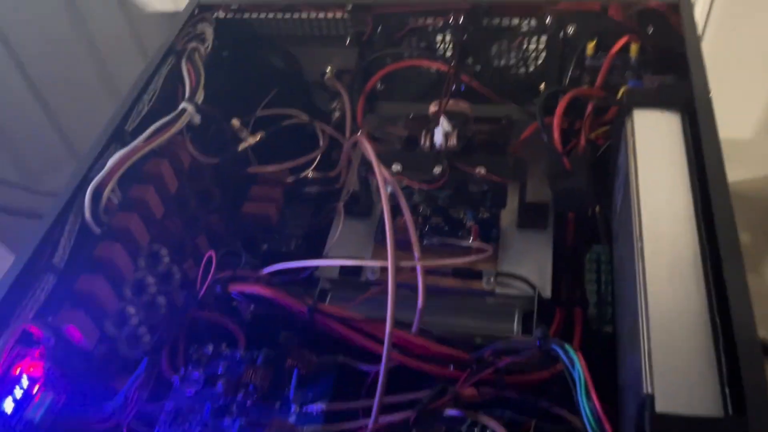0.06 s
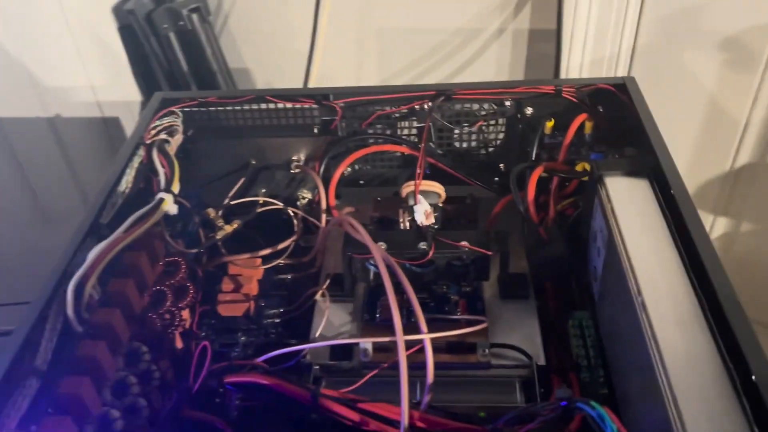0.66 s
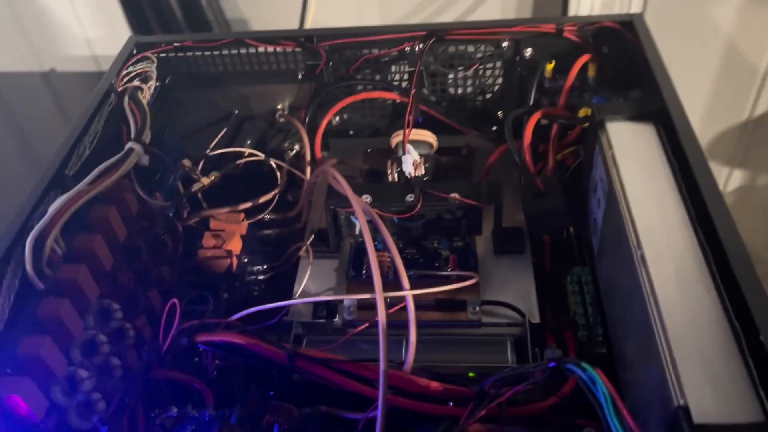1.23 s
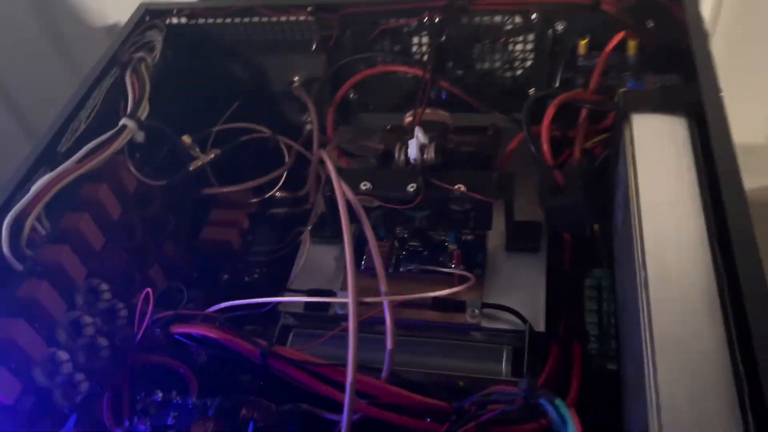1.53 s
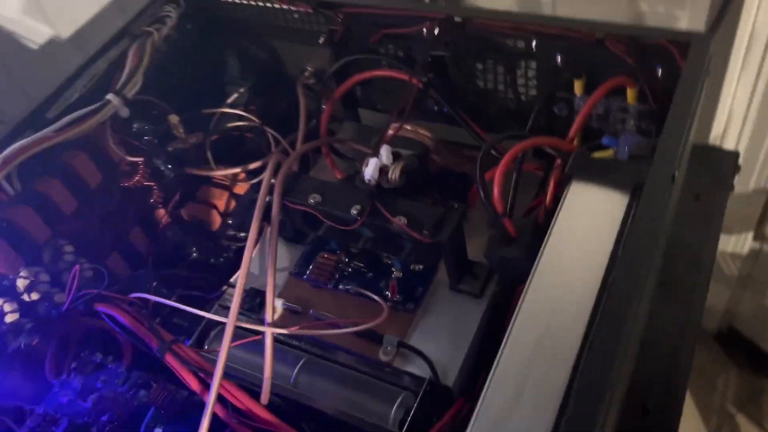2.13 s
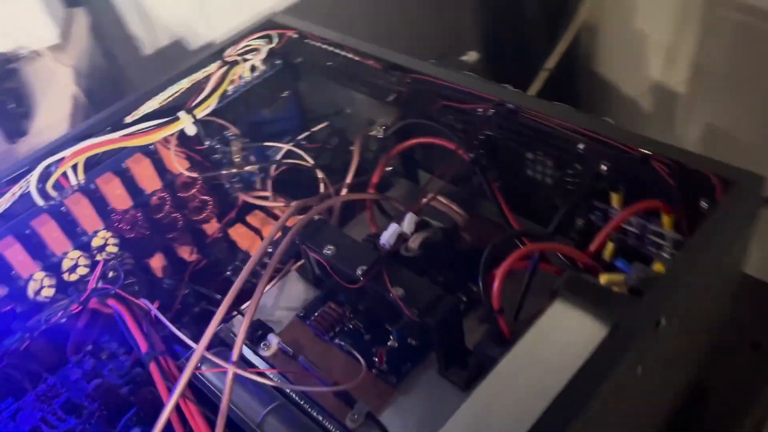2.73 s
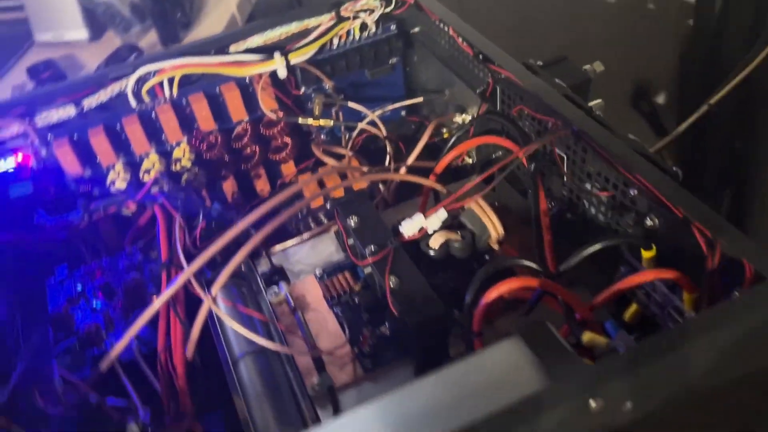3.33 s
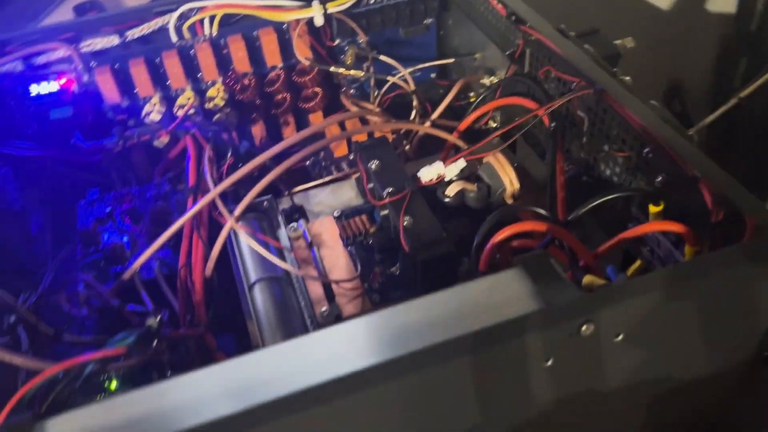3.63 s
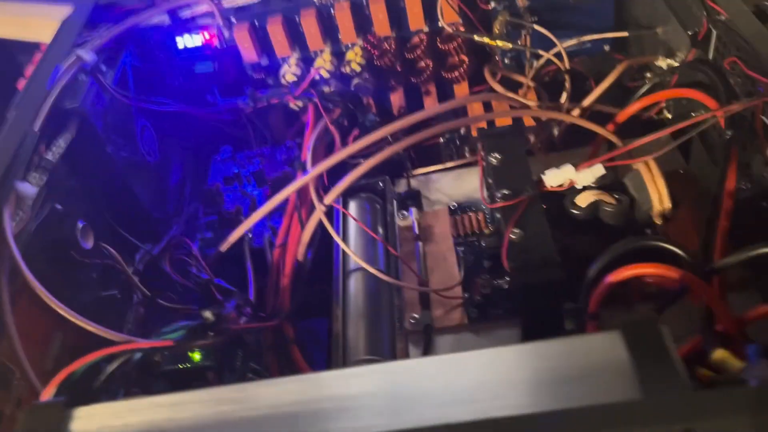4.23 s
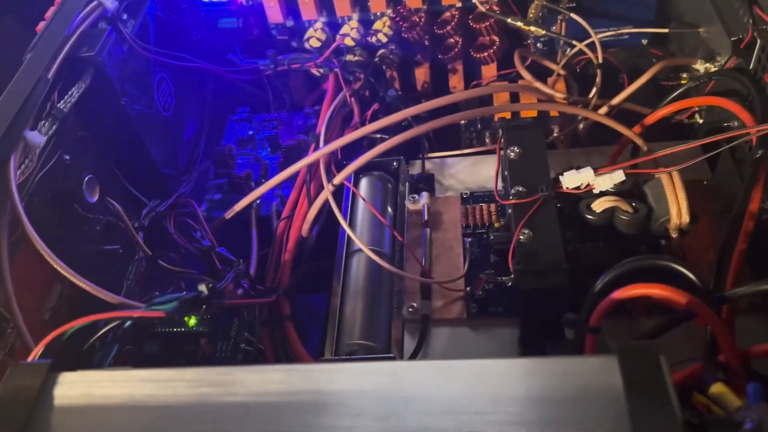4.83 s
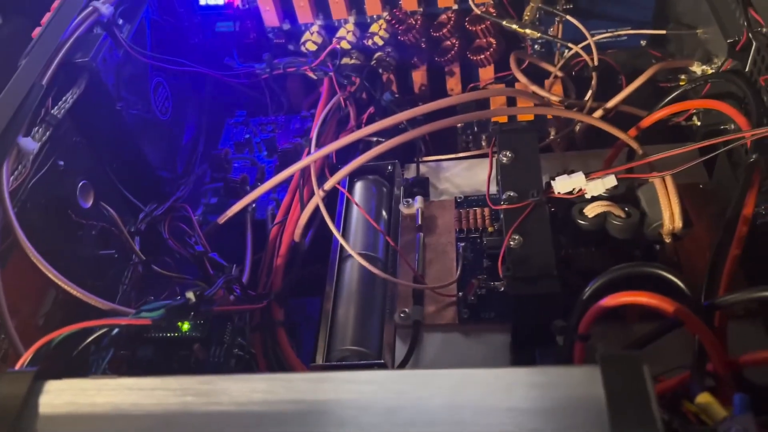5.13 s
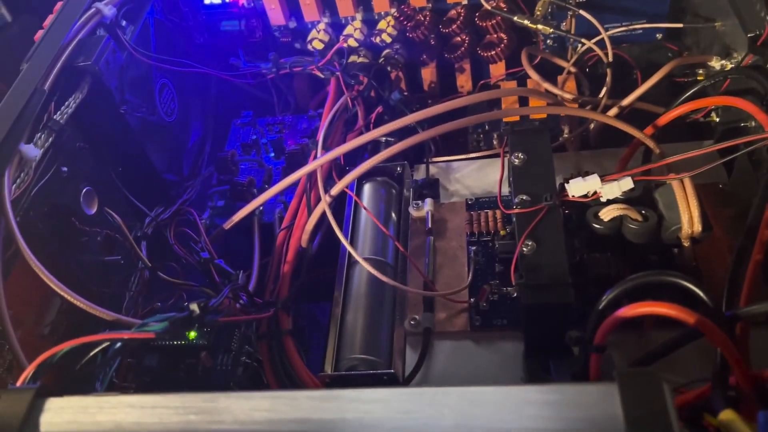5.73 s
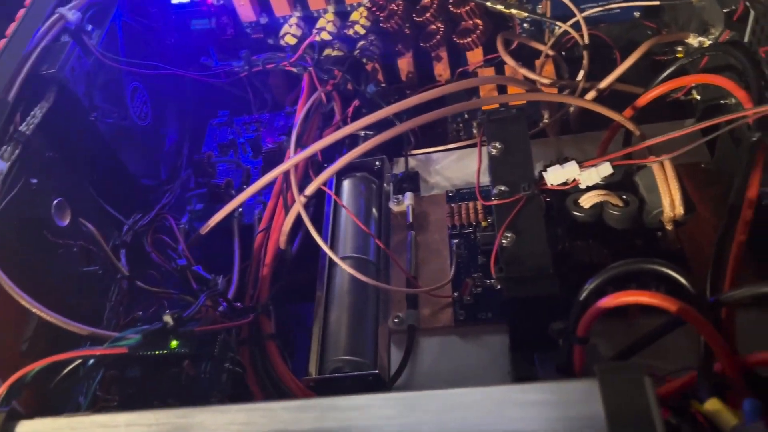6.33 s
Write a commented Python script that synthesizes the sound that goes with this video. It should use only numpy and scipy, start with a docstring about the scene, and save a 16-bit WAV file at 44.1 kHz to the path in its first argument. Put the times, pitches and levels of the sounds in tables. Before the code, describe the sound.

Two small cooling fans run without a break inside an open electronics case for about six and a half seconds, heard close on a hand-held stereo microphone. They make a steady whir of several mid-pitched tones that beat gently together, with rushing, hissing air, a softly throbbing low hum and two thin, shimmering whines high above. The pitch holds steady, but single tones swell, fade and shift between left and right as the microphone moves over the case toward its side. From about 1.8 seconds one fan's note grows firmer. Fingers brush faintly on the microphone's body near 0.7 seconds, and soft dry ticks with brushes come at about 2.3, 3.6 and 4.1 seconds, followed by a slight low bump at 4.3. From around 4 seconds the hiss turns a little brighter, and the fans carry on to the end.

```python
"""Two small cooling fans in an open equipment case, close up, on a hand-held camera's stereo mic.
The main fan sings on multiples of its shaft speed; a smaller fan adds its own note, two thin motor
whines sit high above, and air rushes through the case over a low hum. The mic drifts from the front,
over the case and toward its side, so tones swell and fade at each port as it crosses standing waves.
Fingers tick, brush and bump faintly on the camera body."""
import sys
import numpy as np
from scipy import signal
from scipy.fft import rfft, irfft
from scipy.io import wavfile
from scipy.ndimage import map_coordinates

SR = 44100
rng = np.random.default_rng(int(sys.argv[2]) if len(sys.argv) > 2 else 0)


def int16_out(signal):
    """Quantize to a 16-bit WAV file."""
    q = np.round(np.clip(np.atleast_2d(signal).T, -1, 1) * 32767)
    wavfile.write(sys.argv[1], SR, q.astype(np.int16))


N = 285060
TIME = np.arange(N) / SR
BINS = np.fft.rfftfreq(N, 1 / SR)

# Mic path: time_s, place (0 in front of the case, 1 over it, 2 at its side).
# Below, "by place" is one value for each; pan_db is left minus right; lead_rad is the left port's lead.
MIC_PATH = [(1.15, 0.6), (1.8, 1), (2.3, 1.4), (3.3, 1.77), (4.1, 1.7)]

# Air churning in the case, and hissing past blades and grilles: freq_hz, left_db, right_db
ROAR_SPECTRUM = [(20, -93, -93), (45, -76.5, -77), (82.5, -77, -76.5), (170, -70, -71), (220, -74, -73),
                 (298, -65.5, -67.5), (407, -73, -73), (530, -72.5, -77.5), (720, -74, -72),
                 (730, -75.5, -75.5), (1480, -79, -78), (1500, -80.5, -79.5), (2170, -84, -83.5),
                 (2570, -110, -110)]
HISS_SPECTRUM = [(1800, -110, -110), (2150, -86, -85.5), (2480, -82.8, -81), (2950, -84, -82.5),
                 (3250, -86.2, -84.3), (4600, -88.4, -83.7), (5600, -91.7, -85.3), (7100, -97.6, -89.4),
                 (9000, -93.3, -92.8), (10300, -98, -98), (11400, -97.3, -97.3), (13000, -103, -103),
                 (15600, -101, -101)]
PORT_LIKENESS = [(40, 1), (70, 1), (150, 0.75), (300, 0.92), (640, 0.42), (1300, 0.44), (2000, 0.21),
                 (3500, 0.3), (7000, 0.15), (7700, .5), (9000, 0.78), (10000, .62), (12000, 0.8)]  # air noise shared by the ports: freq_hz, coherence
PORT_LEAD = [(100, 0), (300, 0.15), (650, -0.8), (1300, -0.1), (2700, -1.2), (4500, -0.8), (7600, -1.7),
             (9000, 0.35), (10400, 3.1), (12000, 6), (12800, 6.8), (13800, 9.4), (15200, 12.5)]  # its phase between them: freq_hz, lead_rad
HOLLOW_GAIN = [(0, -.5, .5), (.6, .5, 2), (1.7, 1.8, 3), (2.3, 1.2, .5), (3.3, 0, -3.5), (4, -.5, -3),
               (5, 0, -1.5), (5.7, 0, -2), (6.45, 1.5, 0)]  # hollow case resonance: time_s, left_db, right_db
HOLLOW_NEARNESS = (3, -1, -1)  # how near the mic is to it: gain_db by place
RUSH_GAIN = (-1.5, 0.5, -1.2)  # broad rush of air: gain_db by place
# Deepest case resonance, grille hiss and finest hiss along the mic path: time_s, gain_db
DEEP_GAIN = [(0, .3), (1.3, -.5), (2.3, -.8), (3.4, -.8), (4.3, 1), (5.5, 4.2), (6.45, 1.8)]
GRILLE_GAIN = [(0, -2), (.4, -1.3), (1.2, -1.3), (1.75, 0.1), (2.3, -1.1), (2.8, -1.7), (3.4, -1.2),
               (4, -1.4), (4.3, -0.5), (5.2, -.8), (5.8, -0.5), (6.45, 0.4)]
FIZZ_GAIN = [(0, -.2), (1, .2), (1.7, 1), (2.5, -.6), (3.4, -2), (3.9, -1.5), (4.25, .5), (5.2, -.6),
             (6.45, .6)]
WALL_DELAY = [(0, 1.17), (1.3, 1.12), (2.5, 1.2), (4, 1.18), (6.46, 1.1)]  # echo off the case wall: time_s, delay_ms
BOARD_GAPS = [(284, 0.068, (-58, -58, -56.5)), (550, 0.13, (-74, -54.5, -53)),
              (730, 0.037, (-64, -60.5, -55)), (886, .08, (-75, -62, -60)), (1157, 0.17, (-68, -53, -73)),
              (1750, 0.054, (-71, -57.5, -62)), (2505, 0.025, (-57, -62.5, -58)),
              (2734, 0.038, (-64, -58.5, -77)), (2993, 0.046, (-79, -61, -58.5))]  # resonances between boards: centre_hz, log_width, level_db by place
JET_LEVEL = [(3.6, -77), (4.2, -57), (5.7, -55), (6.46, -58)]  # a grille's jet coming on axis: time_s, level_db
STRONG_HUM = [(0.0, -61), (1.3, -60), (1.47, -50), (2.15, -55), (2.97, -53), (3.62, -67), (4.3, -48.5),
              (5.12, -56.5), (6.45, -53)]  # strongest chassis hum line: time_s, level_db
FAINT_HUM = [(42.4, -66), (96.2, -69), (154.8, -65), (168.2, -60), (192.5, -65), (195.1, -64)]  # fainter lines: pitch_hz, level_db

HANDLING_TICKS = [(2.312, -44.5, -22), (3.550, -38.5, -13), (4.131, -39.5, -8)]  # ticks: start_s, base_level_db, rattle_relative_db
# Finger brushes and low bumps on the camera body: centre_s, level_db, half_length_s
FINGER_BRUSHES = [(0.67, -56, .035), (2.32, -58, .03), (3.565, -56.5, .03), (4.17, -56, .04)]
BODY_BUMPS = [(4.278, -48, 0.11)]
# Colour of each handling noise: freq_hz, gain_db
TICK_SPECTRUM = [(500, -26), (1500, 4), (2800, 5), (4000, -5), (5500, -1), (8000, -9.5), (15000, -30)]
BRUSH_SPECTRUM = [(500, -25), (1500, -13), (2800, 5), (5500, -1), (8500, 3), (12000, -11), (15000, -18)]
BUMP_SPECTRUM = [(15, -22), (42, 2), (65, 9), (100, -14), (150, -34), (500, -55)]

# Tones as the mic crosses their standing waves: time_s, level_db, pan_db, lead_rad
LOW_WHINE_PATH = [(0.0, -60.0, -14.0, 2.4), (0.28, -60.0, -11.0, 2.3), (0.36, -67.5, -3.0, 1.9),
                  (0.84, -73.0, 0.0, 0.4), (1.16, -61.5, -14.0, 3.4), (1.36, -57.5, -9.0, 4.4),
                  (1.76, -58.0, -5.0, 2.0), (2.04, -57.5, -21.0, 0.6), (2.24, -63.5, -12.0, 3.1),
                  (2.36, -59.0, -13.0, 4.3), (2.64, -64.0, -13.0, 2.9), (2.8, -56.5, -22.0, 3.8),
                  (3.08, -59.0, 2.0, 0.8), (3.44, -60.5, -5.0, 2.4), (3.56, -65.0, 4.0, 2.4),
                  (4.16, -57.0, -2.0, 6.3), (4.56, -65.0, 7.0, 6.1), (4.88, -59.0, 2.0, 5.3),
                  (5.12, -64.5, 4.0, 6.7), (5.4, -59.5, 5.0, 6.3), (5.6, -67.0, 9.0, 7.0),
                  (5.88, -65.5, 11.0, 4.4), (6.32, -59.0, -1.0, 5.5), (6.46, -61.0, 0.0, 6.0)]
HIGH_WHINE_PATH = [(0.0, -59.5, -9.0, -2.4), (0.2, -66.5, -2.0, -2.2), (0.44, -59.5, -10.0, -1.4),
                   (0.72, -71.0, 4.0, -0.1), (1.04, -62.5, -4.0, 4.5), (1.6, -59.0, -8.0, 3.8),
                   (1.72, -64.0, -11.0, 3.0), (2.08, -64.0, -6.0, 4.8), (2.28, -69.5, 6.0, 5.6),
                   (3.28, -64.5, -8.0, 9.5), (3.4, -70.0, 3.0, 11.6), (3.6, -61.5, -10.0, 11.7),
                   (4.0, -64.5, -10.0, 7.8), (4.28, -64.5, -1.0, 7.2), (4.48, -66.5, -9.0, 8.4),
                   (4.68, -62.5, -7.0, 6.5), (5.08, -63.0, -3.0, 5.3), (5.72, -55.0, -8.0, 5.6),
                   (6.04, -55.5, -13.0, 6.2), (6.46, -61.5, -9.0, 7.6)]
SMALL_BLADE_PATH = [(0, -53, -5, 0), (.35, -56.5, -17, 2.8), (1, -55, -13, 2.3), (1.45, -53.5, -10, .2),
                    (1.8, -46.8, -2, .1), (2.2, -46, 0, .2), (2.55, -47.8, -2, .1), (3.1, -45, 1, -.25),
                    (4.1, -45.2, -1, -.1), (5, -45.3, 1, -.15), (6.45, -45.8, 1, 0)]
SMALL_OVERTONE_PATH = [(0.0, -67.5, -9.0, 0.2), (0.44, -63.5, 6.0, 1.9), (1.04, -60.0, -7.0, 1.9),
                       (1.36, -59.0, -5.0, 2.6), (1.52, -64.0, -8.0, 2.7), (1.8, -58.0, -5.0, 3.0),
                       (2.32, -62.5, -7.0, 4.5), (2.76, -65.5, 7.0, 4.4), (3.24, -68.5, 7.0, 0.4),
                       (3.88, -62.5, 8.0, -0.1), (4.52, -57.0, -3.0, 0.5), (4.68, -58.5, 1.0, 0.1),
                       (5.48, -60.0, -1.0, 0.7), (6.04, -61.0, -6.0, 0.2), (6.46, -67.0, -7.0, -0.0)]
LOW_MOTOR_PATH = [(0.0, -57.5, -4.0, -0.2), (0.32, -58.0, -2.0, -0.3), (0.48, -65.0, -12.0, 1.3),
                  (1.0, -57.0, -4.0, 0.1), (1.16, -60.5, -10.0, 0.2), (1.6, -53.0, -5.0, 0.2),
                  (1.96, -52.5, 5.0, -0.0), (2.16, -57.5, 9.0, 0.6), (2.6, -54.5, 3.0, 1.4),
                  (3.28, -59.5, -18.0, 0.5), (3.44, -56.0, -10.0, -0.3), (3.96, -59.0, -9.0, 0.2),
                  (4.36, -52.5, -7.0, 0.1), (5.0, -54.0, -11.0, -0.5), (6.46, -54.5, -9.0, 0.3)]
HIGH_MOTOR_PATH = [(0, -47.5, -5, -.1), (.24, -51, -5, .1), (.44, -50.5, -11, .8), (.88, -48.5, -3, .7),
                   (1.16, -51, 1, .9), (1.52, -49.5, -7, .2), (1.64, -50, -14, .6), (2, -46.5, -1, .2),
                   (2.28, -48, 3, -.2), (2.6, -46.5, 7, -.3), (2.76, -48, 5, .2), (2.96, -44.5, 2, .2),
                   (3.35, -44.8, 0, 0), (3.72, -46.7, -2, -.5), (3.84, -50.5, -3, -.6),
                   (4.4, -48.7, -12, .2), (4.72, -49.5, -12, -1), (4.9, -48.3, -12, -.7),
                   (6.46, -50, -11, -.5)]
RING_PATH = [(0.0, -67.0, 1.0, 0.9), (0.44, -67.0, -10.0, -1.2), (1.08, -68.0, 4.0, -0.4),
             (1.36, -65.5, -3.0, -0.1), (1.68, -57.5, 1.0, 0.4), (2.0, -57.0, 4.0, 0.6),
             (2.32, -61.5, 1.0, 0.6), (3.68, -64.0, 2.0, -0.5), (3.84, -68.0, 4.0, -0.8),
             (4.16, -62.5, -13.0, -2.4), (4.52, -59.5, -7.0, -1.5), (5.12, -62.0, -5.0, -2.1),
             (6.46, -64.0, 0.0, -1.6)]
# Tuning of the motor whines: time_s, pitch_hz
LOW_WHINE_PITCH = [(0, 5912), (1.7, 5910), (2.75, 5917), (3.7, 5914), (4.3, 5909), (5, 5912), (6.46, 5908)]
HIGH_WHINE_PITCH = [(0, 6033), (1, 6041), (1.9, 6031), (2.5, 6036), (2.8, 6044), (3.3, 6034), (3.7, 6040),
                    (4.4, 6036), (5.2, 6042), (5.7, 6040), (6.46, 6048)]
SMALL_FAINT_TONES = [(2, -68), (8, -72.5)]  # small fan's upper tones: blade_note_multiple, level_db
SHAFT_SPEED = [(0, 62.42), (1.1, 62.43), (1.9, 62.35), (6.46, 62.37)]  # main fan's shaft: time_s, turns_per_s
WEAK_TONES = [(1, -56.5), (2, -65), (4, -59), (6, -58.5), (8, -67), (12, -63.5), (13, -70), (20, -70),
              (24, -71), (28, -67), (29, -65), (30, -69), (35, -72), (41, -71), (43, -72), (44, -69),
              (47, -74), (49, -76), (51, -75), (58, -74), (83, -77), (84, -76), (110, -81), (112, -80)]  # its weak tones: shaft_multiple, base_level_db
MIDDLE_TONES = [(7, (-53, -68, -62), (4, 1, -6)), (9, (-55, -52, -57.5), (4, 5, -6)),
                (10, (-53, -60, -63.5), (-2, 3, 2)), (11, (-53.5, -55.5, -59), (-2, 0, 1)),
                (14, (-75, -72, -58.5), (-8, 5, -6))]  # its middle tones: shaft_multiple, level_db by place, pan_db by place


def amp(db):
    """Decibels to gain."""
    return 10 ** (np.asarray(db) / 20)


def unit_rms(x):
    """Scales to rms 1."""
    return x / np.sqrt(np.mean(x ** 2) + 1e-20)


def follow(rows):
    """Each column of a time table, sample by sample."""
    times, *columns = np.transpose(rows)
    return np.array([np.interp(TIME, times, column) for column in columns])


def per_bin(rows):
    """Each column of a spectrum table, interpolated in log frequency."""
    hz, *columns = np.transpose(rows)
    return np.array([np.interp(np.log(BINS + 1), np.log(hz + 1), column) for column in columns])


def at_mic(by_place):
    """Glides between the values at the three places as the mic moves."""
    return np.interp(follow(MIC_PATH)[0], np.arange(len(by_place)), by_place)


def bell(hz, width):
    """A bell on the log-frequency axis."""
    return np.exp(-(np.log(BINS / hz + 1e-9) / width) ** 2)


def drift(rate_hz, knots_per_s=400):
    """A random wander of rms 1, changing up to about rate_hz."""
    knots = rng.standard_normal(4096)
    hz = np.fft.rfftfreq(len(knots), 1 / knots_per_s)
    slow = irfft(rfft(knots) * np.exp(-(hz / rate_hz) ** 2) * (hz > 0))
    return np.interp(TIME, np.arange(len(slow)) / knots_per_s, unit_rms(slow))


def noise(colour, shape=N):
    """Coloured noise of rms 1."""
    return unit_rms(irfft(rfft(rng.standard_normal(shape)) * colour, N))


def swells(rows):
    """An envelope of brief bell-shaped swells."""
    return sum(amp(db) * np.exp(-((TIME - centre_s) / half_s) ** 2) for centre_s, db, half_s in rows)


def tone(turns, db):
    """A sine on a running cycle count, at an rms level."""
    return np.sqrt(2) * amp(db) * np.sin(2 * np.pi * turns)


def stereo_tone(turns, db, pan_db, lead_rad, flutter):
    """A tone at both mic ports; uneven inflow makes it flutter."""
    lead_turns = np.array([[1], [0]]) * lead_rad / (2 * np.pi)
    shares = amp([pan_db / 2, -pan_db / 2])
    panned = tone(turns + rng.random() + lead_turns, db) * shares / shares.mean(0)
    return panned * (1 + flutter * drift(15))


def swept_tone(turns, path, flutter):
    """A tone whose level, pan and phase change as the mic crosses its standing waves."""
    return stereo_tone(turns, *follow(path), flutter)


def placed_tone(turns, db, pan_db, lead_rad, flutter, sway_hz=1.5):
    """A tone whose level and pan follow the mic's place and sway with the hand."""
    level = at_mic(db) + drift(sway_hz)
    pan = at_mic(pan_db) + drift(sway_hz)
    return stereo_tone(turns, level, pan, lead_rad, flutter)


def turbulence(spectrum):
    """Spectra of air noise at the two ports, alike in the bass and less so higher up."""
    left, unrelated = rfft(rng.standard_normal((2, N)))
    likeness = np.clip(per_bin(PORT_LIKENESS)[0], -1, 1)
    right = likeness * left + np.sqrt(1 - likeness ** 2) * unrelated
    right *= np.exp(-1j * per_bin(PORT_LEAD)[0])
    return np.array([left, right]) * amp(per_bin(spectrum)) * np.sqrt(SR / 2)


def wall_echo(sound, share=0.12):
    """The case wall's echo combs the sound; its delay changes with the mic's distance."""
    earlier = np.arange(N) - follow(WALL_DELAY)[0] * SR / 1000
    return sound + share * np.array([map_coordinates(port, [earlier], order=3) for port in sound])


def air():
    """Roar with two case resonances, and hiss that flickers with the flow."""
    roar, hiss = turbulence(ROAR_SPECTRUM), turbulence(HISS_SPECTRUM)
    hollow, deep, fine = bell(hz=296, width=0.3), bell(hz=176, width=0.18), bell(hz=10000, width=0.6)
    drone = irfft(roar * hollow, N) * amp(follow(HOLLOW_GAIN))
    boom = irfft(roar * deep, N) * amp(follow(DEEP_GAIN))
    rush = irfft(roar * (1 - hollow - deep), N) * amp(at_mic(RUSH_GAIN))
    grille_db = follow(GRILLE_GAIN) + 0.4 * drift(16) + 0.85 * drift(47)
    grille = wall_echo(irfft(hiss * (1 - fine), N)) * amp(grille_db)
    fizz_db = follow(FIZZ_GAIN) + 0.4 * drift(6) + 0.6 * drift(50)
    fizz = irfft(hiss * fine, N) * amp(fizz_db)
    return drone + boom + rush + grille + fizz


def board_gaps():
    """Air rings the gaps between the boards and gives the hiss a reedy colour."""
    flow = rfft(rng.standard_normal((2, N)))
    return sum(unit_rms(irfft(flow * bell(hz, width), N)) * amp(at_mic(db))
               for hz, width, db in BOARD_GAPS)


def grille_jet():
    """A jet of air straight ahead of the mic hisses at both ports alike."""
    return noise(bell(hz=4680, width=0.32)) * amp(follow(JET_LEVEL)[0])


def chassis_hum(strong_hz=57.9):
    """The chassis hums low; its strongest line throbs against the main fan's shaft tone."""
    strong = tone(strong_hz * TIME + rng.random() + 0.12 * drift(0.37), follow(STRONG_HUM)[0])
    faint = sum(tone(hz * TIME + rng.random() + 0.1 * drift(2.1), db + 2.6 * drift(0.61))
                for hz, db in FAINT_HUM)
    return strong + faint


def handling_ticks(decay_s=0.0025, rattle_decay_s=0.03):
    """Soft dry ticks, a little to the right, with a short rattle inside the case."""
    envelope = np.zeros(N)
    for start_s, db, rattle_db in HANDLING_TICKS:
        age = np.maximum(TIME - start_s, 0)
        rattle = amp(rattle_db) * np.exp(-age / rattle_decay_s)
        envelope += amp(db) * (TIME >= start_s) * (np.exp(-age / decay_s) + rattle)
    return noise(amp(per_bin(TICK_SPECTRUM)), shape=(2, N)) * envelope * amp([[1], [4]])


def finger_brushes():
    """Short soft swishes of skin on the camera body, right by the mic."""
    return unit_rms(irfft(turbulence(BRUSH_SPECTRUM), N)) * swells(FINGER_BRUSHES)


def body_bumps():
    """A brief rumble reaches the mic through the camera body."""
    return noise(amp(per_bin(BUMP_SPECTRUM)[0])) * swells(BODY_BUMPS)


def motor_whine(pitch, path):
    """A thin, shimmering whine that fades and shifts sideways as the mic moves."""
    hz = follow(pitch)[0] * (1 + 0.00016 * drift(2.3) + 0.00046 * drift(24.6))
    return swept_tone(np.cumsum(hz) / SR, path, flutter=0.2) * amp(0.6 * drift(6))


def small_fan(blade_hz=571.4):
    """A faster fan whose firm blade note beats against the main fan's ninth tone."""
    turns = np.cumsum(blade_hz * (1 + 0.000397 * drift(0.4))) / SR
    note = swept_tone(turns, SMALL_BLADE_PATH, flutter=0.03)
    overtone = swept_tone(4 * turns, SMALL_OVERTONE_PATH, flutter=0.15)
    faint = sum(stereo_tone(multiple * turns, db, pan_db=4 * drift(0.7), lead_rad=drift(0.5), flutter=0.19)
                for multiple, db in SMALL_FAINT_TONES)
    return note + overtone + faint


def weak_shaft_tones(turns, shaft_hz, fade_db=0.8, apart_hz=1100):
    """Weak tones fade in standing waves; short waves differ more between the ports."""
    ports = np.zeros((2, N))
    near_db = at_mic(HOLLOW_NEARNESS)
    for multiple, db in WEAK_TONES:
        apart = min(multiple * shaft_hz / apart_hz, 1)
        # near the hollow resonance the middle tones gain and the others recede
        lean = 0.82 if 3 < multiple < 13 else -0.57
        level = db + lean * near_db + fade_db * np.sqrt(apart) * drift(0.89)
        side_db, side_turns = fade_db * apart * drift(0.97), 0.2 * apart * drift(0.63)
        phase = multiple * turns + rng.random()
        ports += [tone(phase + side_turns, level + side_db), tone(phase - side_turns, level - side_db)]
    return ports


def main_fan(blades=5):
    """Blade and motor tones, all locked to one slightly unsteady shaft."""
    shaft_hz = follow(SHAFT_SPEED)[0] * (1 + 0.0003 * drift(5))
    turns = np.cumsum(shaft_hz) / SR
    low_motor = swept_tone(16 * turns, LOW_MOTOR_PATH, flutter=0.07)
    high_motor = swept_tone(22 * turns, HIGH_MOTOR_PATH, flutter=0.07)
    ring = swept_tone(31 * turns, RING_PATH, flutter=0.18)
    blade_note = placed_tone(blades * turns, db=(-50, -46.5, -49), pan_db=(0, -1, 2),
                             lead_rad=-0.019, flutter=0.014)
    middle = sum(placed_tone(multiple * turns, db, pan_db, lead_rad=-0.4, flutter=0.052)
                 for multiple, db, pan_db in MIDDLE_TONES)
    return blade_note + low_motor + high_motor + ring + middle + weak_shaft_tones(turns, shaft_hz.mean())


def scene():
    """Fans, whines, hum, air and handling noise as they reach the mic."""
    whines = motor_whine(LOW_WHINE_PITCH, LOW_WHINE_PATH) + motor_whine(HIGH_WHINE_PITCH, HIGH_WHINE_PATH)
    machine = main_fan() + small_fan() + whines + chassis_hum()
    airflow = air() + board_gaps() + grille_jet()
    handling = handling_ticks() + finger_brushes() + body_bumps()
    return machine + airflow + handling


def record(dry, low_cut_hz=22, high_cut_hz=15680):
    """The deepest bass is rolled off, and the hiss ends just below 16 kHz."""
    low_cut = signal.butter(2, low_cut_hz, "high", fs=SR, output="sos")
    high_cut = signal.firwin(511, high_cut_hz, window=("kaiser", 9), fs=SR)
    return signal.oaconvolve(signal.sosfilt(low_cut, dry), high_cut[None], "same")


dry = scene()
out = record(dry)
int16_out(out)
```